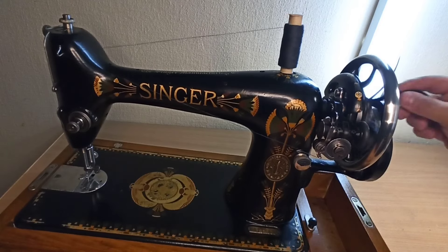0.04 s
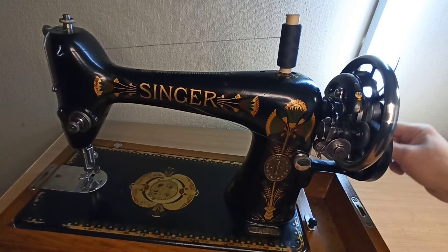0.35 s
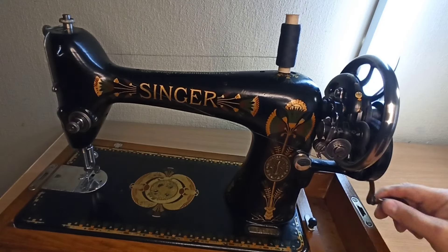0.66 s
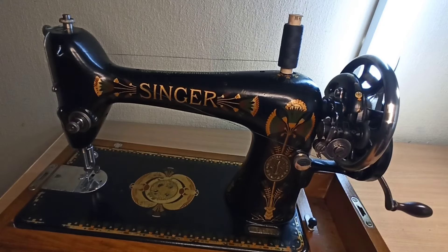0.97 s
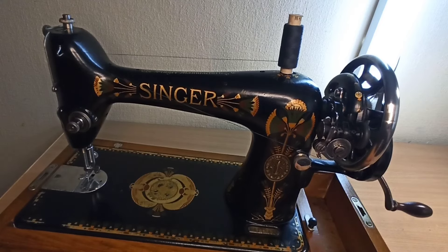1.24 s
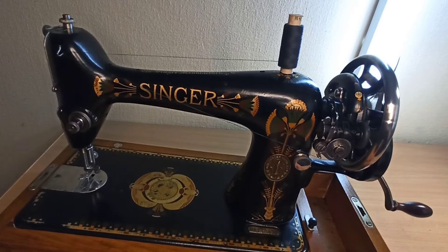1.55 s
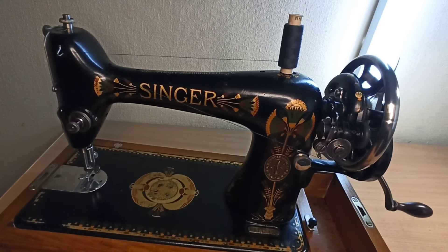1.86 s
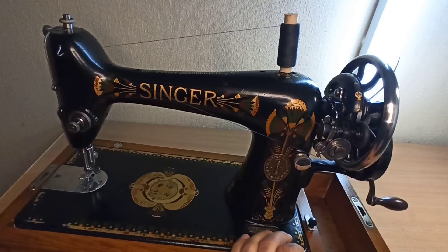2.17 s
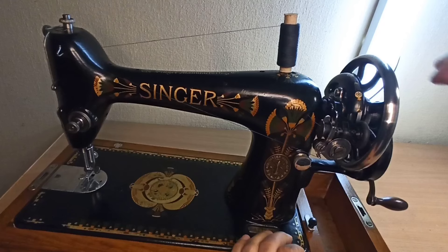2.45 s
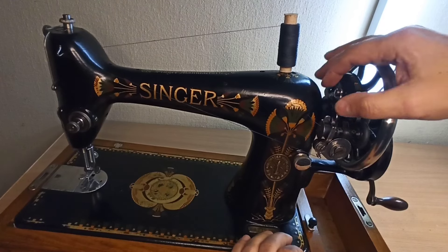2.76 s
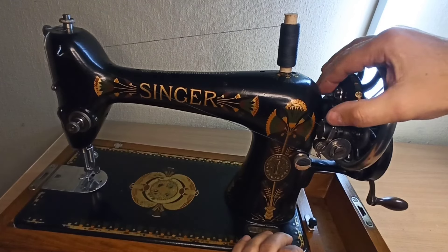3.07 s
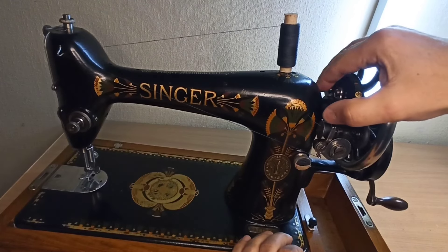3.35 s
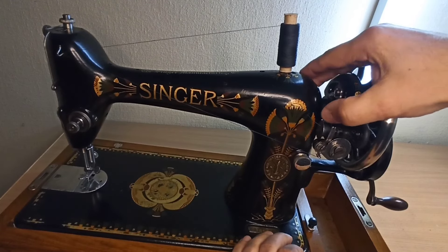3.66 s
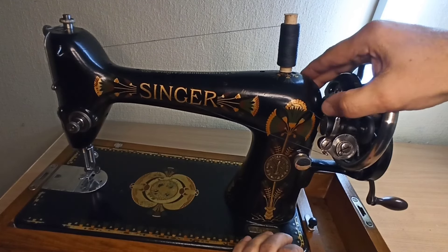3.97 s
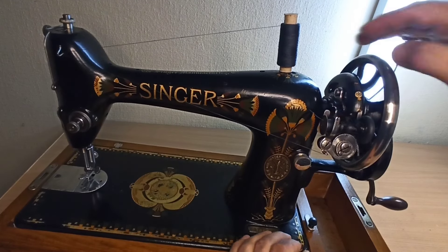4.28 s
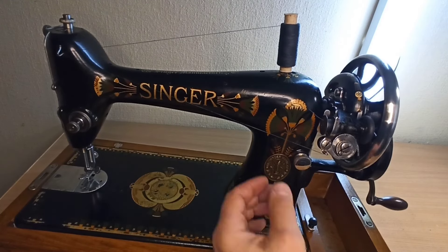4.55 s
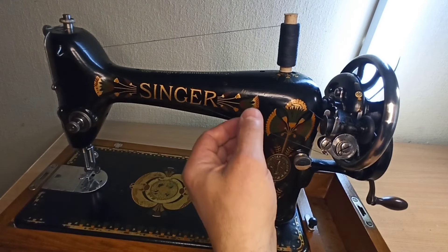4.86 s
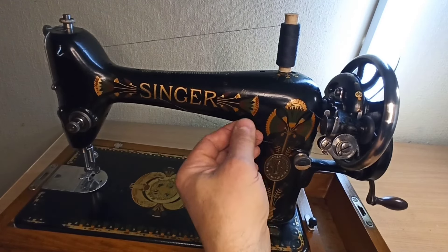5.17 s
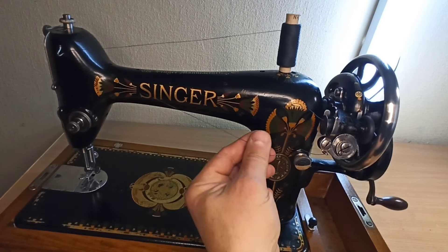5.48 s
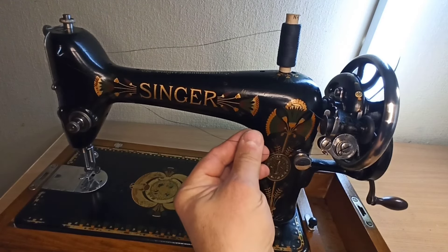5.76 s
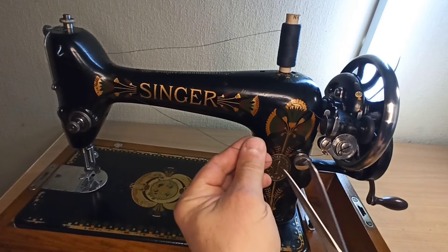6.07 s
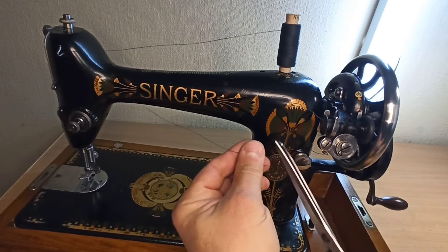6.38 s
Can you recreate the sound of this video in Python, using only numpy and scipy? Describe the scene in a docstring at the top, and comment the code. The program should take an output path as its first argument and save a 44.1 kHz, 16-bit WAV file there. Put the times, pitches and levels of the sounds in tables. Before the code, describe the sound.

In a small, quiet room, a hand-crank sewing machine turns slowly with a soft whir and clunking gears, coasting to rest after about a second. Fingers faintly brush and bump it. A sharp steel snap shakes the iron frame, then scissors knock and clink in a wooden box as they are fished out. Finally, thread is drawn tight with a tiny zip and snipped. Everything is heard close up, with little echo.

```python
"""In a small, quiet room, a hand-crank sewing machine on a wooden base is turned slowly: its gears
clunk and drone, steel slides on steel, and after about a second it coasts to rest. Fingers brush and
bump it. Near 3.9 s a hand snaps the bobbin winder back, which shakes the iron frame and its base.
Around 5 s scissors knock about in the wooden side box as they are fished out. Last, the thread is
drawn tight with a zip (5.9 s) and snipped (6.4 s)."""
import sys
import numpy as np
from scipy import signal
from scipy.io import wavfile
from scipy.ndimage import uniform_filter1d

SR = 44100
rng = np.random.default_rng(int(sys.argv[2]) if len(sys.argv) > 2 else 0)


def dump(signal):
    """Clip the signal to [-1, 1] and save it as 16-bit WAV at the path in sys.argv[1]."""
    limited = np.clip(np.atleast_2d(signal).T, -1, 1)
    pcm = np.round(limited * 32767).astype(np.int16)
    wavfile.write(sys.argv[1], SR, pcm)


N = 287532

# Levels in the tables are relative: the functions may turn a whole layer up or down.
# Tone colours: how strong a sound is from low to high. Each row: frequency in Hz, level in dB.
AIR_COLOUR = [(25, -19), (48, -13), (70, -1.5), (105, 3.5), (300, -2), (500, -7), (900, -12), (1500, -15.5),
              (2500, -20), (7000, -21), (15500, -24)]  # the still room
BRUSH_COLOUR = [(300, -17.5), (1200, -8), (2500, -5.5), (4500, -5.5), (6200, -0.5), (7300, 5), (8500, 1),
                (12000, -3.5), (15500, -7)]  # light brushing
BUMP_COLOUR = [(60, -21.5), (120, 1), (250, -2.5), (350, 1.5), (430, 7.5), (520, -10.5), (850, -6),
               (1400, -26), (4000, -31), (9000, -43)]  # a soft touch on the base
WOOD_COLOUR = [(50, -30), (90, -1.5), (180, 2), (320, -0.5), (430, 5), (800, -1.5), (1200, -6.5),
               (1900, -15.5), (2500, -21.5), (3800, -41), (5500, -32), (15000, -52)]  # the boards of the side box
HANDLE_COLOUR = [(300, -10), (900, 1), (1400, -9), (1980, 12), (2350, -12.5), (2850, 5), (3200, -5),
                 (3800, 0.5), (4500, -18), (8000, -25), (15000, -47.5)]  # scissor handles clacking
BLADE_COLOUR = [(1000, -16.5), (3000, -9), (5000, -8.5), (6500, -6.5), (7300, 0.5), (7680, 5.5),
                (8100, 1.5), (9000, -3), (12500, -18.5), (15200, -21)]  # scissor blades clinking
SNIP_COLOUR = [(150, 3), (600, -7), (1300, -1.5), (1800, -6), (2200, 0.5), (3100, -8.5), (4000, -1),
               (5500, 4), (7800, 3.5), (12000, -10), (15500, -15)]  # the blades shutting
WHIR_COLOUR = [(60, -20.5), (130, 3.5), (330, 4.5), (650, 0), (780, -8.5), (1100, -4.5), (1400, -23.5),
               (2000, -13.5), (2800, -31), (4200, -37), (6000, -43)]  # the bearings
SLIDE_COLOUR = [(500, -34), (2500, -10), (4300, -7), (5600, -5.5), (6700, 5), (7200, -4), (8200, -1.5),
                (12000, -15), (13800, -8.5), (15500, -13)]  # steel sliding on steel
CLUNK_COLOUR = [(80, -12), (250, -6), (520, 6), (680, 5.5), (800, -4), (1150, -3), (1400, -9), (1750, -6),
                (2100, -10), (2600, -23), (4100, -21), (6000, -30), (12000, -38)]  # gear teeth knocking
SNAP_COLOUR = [(500, -24), (1500, -29), (3400, -11), (4500, -12), (6000, 6), (7600, 2.5), (8600, -2),
               (12000, -2.5), (13300, 0), (15500, -11)]  # steel hitting steel
RATTLE_COLOUR = [(150, -1.5), (450, 0), (1000, 9), (1400, 0), (2200, 1.5), (4000, 1), (7000, -1.5),
                 (9000, -1.5), (15000, -24)]  # the shaken works
THUD_COLOUR = [(30, -45), (60, -20), (110, 3), (250, -4), (450, -12.5), (900, -17.5), (1500, -30),
               (6000, -60.5)]  # the machine pushing into the table
MIC_COLOUR = [(4650, -1), (4950, -11), (6000, -7.5), (6400, 0), (7700, -2), (8400, -9), (8900, -22.5),
              (10000, -27.5), (11450, -22.5), (11800, -4), (13200, -1)]  # the microphone

# Notes a struck part rings with. A ring time (t60) is how long a sound takes to fade by 60 dB.
# Each row: pitch in Hz, level in dB, ring time in seconds.
PANEL_NOTES = [(396, -7, 0.15), (435, 1, 0.198), (669, -13, 0.152)]  # a panel of the base
BOX_NOTES = [(120, -4, 0.4), (182, -4.5, 0.3), (241, -1.5, 0.32), (404.4, 1.5, 0.13), (445, 3, 0.089),
             (531, -5, 0.2), (686, -1, 0.29), (801, -1, 0.27)]  # the wooden side box
CATCH_NOTES = [(4750, -13.5, .03), (6240, -7.5, 0.028), (7400, -2.5, 0.0406), (7700, -1, .04)]  # the small steel catch of the bobbin winder
FRAME_NOTES = [(91.2, -4.5, 0.175), (105.7, 0, 0.2), (119, 1.5, .33), (140, -15.5, 0.21), (182.7, -3, .36),
               (239, -9.5, 0.23), (307, -6.5, .2), (321.6, -4.5, 0.202), (361, -7.5, .14), (438, -5, 0.13),
               (675, -8.5, 0.11), (788, -14.5, 0.21), (876, -6.5, 0.16), (1065, -23, .26), (1124, -33, .2)]  # the iron frame on its hollow base

# How long the room and the box ring on. Each row: frequency in Hz, ring time in seconds.
ROOM_RING_TIMES = [(100, 0.65), (1000, .35), (4000, 0.33), (8000, 0.23), (15000, .17)]
WOOD_RING_TIMES = [(100, 0.67), (500, 0.22), (2000, 0.42), (8000, 1)]

# Sounds that swell and fade. Each row: middle in seconds, length in seconds, peak level in dB.
BRUSHES = [(2.63, 0.11, -74.5), (2.848, 0.048, -67.5), (3.116, 0.055, -76), (3.45, 0.094, -63.5),
           (3.649, 0.2, -71), (4.195, .05, -72.5), (4.52, 0.27, -70.5), (4.971, 0.11, -68),
           (5.658, 0.069, -67.5), (5.854, 0.012, -57), (5.876, 0.092, -56), (6.404, 0.097, -54.5)]  # fingers, thread and closing blades brushing along
DRAGS = [(5.025, 0.26, -54)]  # scissors dragging along the boards
GEAR_DRONE = [(.38, 1.15, -56.5)]  # the gears, loudest in the middle of the turn
HEAVES = [(.08, .26, -48.5), (.575, 0.11, -58), (.785, .14, -51.5)]  # heavy spots where the machine bears down on its base
SCRAPES = [(.07, 0.19, -72), (.462, 0.11, -62.5), (.618, 0.083, -59.5), (.74, 0.14, -60)]  # strokes of steel over steel

# The hum of mains electricity. Each row: pitch in Hz, level in dB.
HUM_TONES = [(200, -84.5), (300, -76), (400, -86), (500, -75), (700, -89.5), (800, -85.5), (900, -86),
             (1000, -89.5)]
# Hand and crank handle touching the base. Each row: start in seconds, level in dB.
BUMPS = [(1.081, -69), (1.261, -64.5), (2.478, -62), (2.512, -56), (2.845, -62), (3.775, -67.5),
         (4.5, -64.5), (6.16, -71), (6.285, -65), (6.45, -69.5)]
# Scissors hitting the box. Each row: start in seconds, then wood, handle and blade levels in dB.
SCISSOR_KNOCKS = [(4.868, -58, -83, -92), (4.9896, -44, -52, -67), (5.035, -47, -76, -91),
                  (5.0994, -39.5, -42, -65), (5.171, -35.5, -39, -35), (5.2533, -34, -36, -33),
                  (5.3043, -42, -36, -47), (5.318, -37, -65, -65), (5.325, -36.5, -65, -58),
                  (5.3424, -39, -39, -64), (5.371, -41, -55, -67), (5.392, -46.5, -68, -78),
                  (5.5065, -42.5, -40.5, -37.5)]
# The notes the turning gears whine at. Each row: pitch in Hz, width in Hz, level in dB.
GEAR_WHINE = [(320.4, 19, -2.5), (562, 7.7, -5.5), (668, 14, -1), (1078, 16, -6), (1974, 120, -12.5),
              (3990, 190, -10.5)]
# Gear teeth taking up their slack. Each row: start in seconds, knock in dB, big gear's boom in dB.
GEAR_CLUNKS = [(.047, -58, -60), (0.094, -70, -68), (.222, -64, -52), (.285, -69, -62), (0.3593, -61, -53),
               (0.477, -58, -49), (.558, -61, -53.5), (0.6681, -61, -62), (0.7707, -47.5, -62)]
# Blows inside the machine, loudest when the winder snaps back.
# Each row: start in seconds, steel click in dB, rattle in dB, thump of the frame in dB.
BLOWS = [(.039, -80, -64, -72), (0.3588, -80, -58.5, -61), (.877, -71, -65, -65), (3.8495, -30, -38.5, -41),
         (3.874, -36.5, -38, -31), (3.902, -59.5, -45, -57), (3.997, -77, -60, -62)]


def amp(db):
    """Turns decibels into a number to multiply a sound by."""
    return 10 ** (np.asarray(db) / 20)


def unit(x):
    """Scales a sound to an average strength (rms) of 1."""
    return x / np.sqrt(np.mean(x ** 2) + 1e-20)


def unit_attack(x):
    """Scales a hit so that its first 10 ms have an average strength of 1."""
    return x / np.sqrt(np.mean(x[:SR // 100] ** 2) + 1e-20)


def look_up(table, hz):
    """Reads between the rows of a table, with all octaves equally wide."""
    row_hz, value = np.transpose(table)
    return np.interp(np.log(hz + 1), np.log(row_hz + 1), value)


def add(mix, start_s, sound):
    """Mixes a sound in at its start time."""
    part = mix[max(round(start_s * SR), 0):][:len(sound)]
    part += sound[:len(part)]


def colour(x, tone, size=4096):
    """Gives a sound a tone colour, with a filter that never rings ahead of a hit."""
    hz = abs(np.fft.fftfreq(size, 1 / SR))
    log_gain = np.log(amp(look_up(tone, hz)))
    taps = np.fft.ifft(np.exp(np.conj(signal.hilbert(log_gain)))).real
    return signal.fftconvolve(x, taps[:size // 2])[:len(x)]


def resonate(x, hz, width_hz):
    """Brings out one pitch; the smaller the width, the purer the note."""
    pole = np.exp(-np.pi * width_hz / SR) * np.exp(2j * np.pi * hz / SR)
    return unit(signal.lfilter([1], [1, -pole], x).real)


def steady(x, span_s=0.04):
    """Evens out a wavering note, as if it were pushed with constant force."""
    power = abs(uniform_filter1d(x ** 2, int(span_s * SR)))
    return x / np.sqrt(power + .02)


def friction(grain_db):
    """Rubbing: countless tiny slips, more uneven the further grain_db is from zero."""
    slips = rng.standard_normal(N)
    sizes = amp(grain_db * np.minimum(rng.exponential(1, N), 5))
    return unit(slips * sizes)


def swells(rows):
    """Loudness over time of strokes that each rise and fall in one smooth arch."""
    t = np.arange(N) / SR
    return sum(amp(db) * np.cos(np.pi * np.clip((t - middle) / length, -.5, .5)) ** 2
               for middle, length, db in rows)


def ring(notes):
    """A struck part rings with a few pure notes, each dying away."""
    t = np.arange(SR * 3 // 4) / SR
    return unit_attack(sum(amp(db - 60 * t / t60) * np.sin(2 * np.pi * hz * t) * (-1) ** k
                           for k, (hz, db, t60) in enumerate(notes)))


def dense_ring(ring_times, size=256):
    """Too many notes to count: noise in which each band fades at its own speed."""
    hz, t, bands = signal.stft(rng.choice([-1., 1.], SR // 2), SR, nperseg=size)
    fade = amp(-60 * t / look_up(ring_times, hz)[:, None])
    return signal.istft(bands * fade, SR, nperseg=size)[1]


def chatter(samples, t60):
    """A fading burst of tiny random pushes."""
    t = np.arange(samples) / SR
    return rng.choice([-1., 1.], samples) * amp(-60 * t / t60)


def click(tone, t60):
    """A hard contact: chatter in the colour of the struck part."""
    return unit_attack(colour(chatter(SR // 2, t60), tone))


def tick(tone, chatter_db, t60):
    """One clean hit followed by chatter."""
    tail = chatter(SR // 4, t60)
    force = signal.unit_impulse(len(tail)) + amp(chatter_db) * tail / np.linalg.norm(tail)
    return unit_attack(colour(force, tone))


def vary(tone, spread_db):
    """A part sounds a little different at each spot where it is struck."""
    hz, db = np.transpose(tone)
    return np.column_stack([hz, db + spread_db * rng.uniform(-0.95, 1, len(db))])


def background():
    """Still air and a faint mains hum."""
    t = np.arange(N) / SR
    hum = sum(amp(db) * np.sqrt(2) * np.sin(2 * np.pi * (hz * t + rng.random())) for hz, db in HUM_TONES)
    return amp(-67.5) * unit(colour(rng.standard_normal(N), AIR_COLOUR)) + hum


def room_echo(x, delay_s=.005):
    """The walls of a small room send the sound back as a short tail."""
    tail = np.concatenate([np.zeros(int(delay_s * SR)), dense_ring(ROOM_RING_TIMES)])
    return signal.fftconvolve(x, tail / np.linalg.norm(tail))[:N]


def thread_zip(taut_hz=9500, slack_hz=6950, sag_s=.016, jitter=0.089, rise_s=0.0053, t60=0.06):
    """Thread slips through the fingers in an uneven squeak that sinks in pitch as it slackens."""
    t = np.arange(SR // 10) / SR
    hz = slack_hz + (taut_hz - slack_hz) * np.exp(-t / sag_s)
    cycles = np.cumsum(hz * (1 + jitter * rng.standard_normal(len(t)))) / SR
    rise = np.minimum(t / rise_s, 1)
    fade = amp(-60 * np.maximum(t - rise_s, 0) / t60)
    return rise * fade * np.sin(2 * np.pi * cycles)


def hands(zip_s=5.902):
    """Light brushing, dull touches that ring a panel of the base, and the pull on the thread."""
    out = swells(BRUSHES) * unit(colour(friction(grain_db=4), BRUSH_COLOUR))
    for start, db in BUMPS:
        add(out, start, amp(db - 2.5) * tick(BUMP_COLOUR, chatter_db=6.5, t60=0.28))
        add(out, start, amp(db - 2.5) * ring(PANEL_NOTES))
    add(out, zip_s, amp(-49.5) * thread_zip())
    return out


def box_knocks():
    """Scissor handles drag over and bump the thin boards of the side box, which ring on."""
    out = swells(DRAGS) * unit(colour(friction(grain_db=4.5), WOOD_COLOUR))
    box = ring(BOX_NOTES)
    for start, wood_db, handle_db, _ in SCISSOR_KNOCKS:
        boards = unit_attack(colour(dense_ring(WOOD_RING_TIMES), WOOD_COLOUR))
        add(out, start, amp(wood_db - 3.5) * boards)
        add(out, start, amp(wood_db - 8) * tick(WOOD_COLOUR, chatter_db=7, t60=0.081))
        add(out, start, amp(wood_db - 6) * box)
        add(out, start, amp(handle_db) * click(vary(HANDLE_COLOUR, spread_db=1.5), t60=0.042))
    return out


def scissor_blades(snip_s=6.4242):
    """The steel blades clink as they are lifted out, and later snip shut."""
    out = np.zeros(N)
    for start, _, _, blade_db in SCISSOR_KNOCKS:
        add(out, start, amp(blade_db) * click(vary(BLADE_COLOUR, spread_db=3), t60=0.021))
    add(out, snip_s, amp(-42.5) * tick(SNIP_COLOUR, chatter_db=10, t60=0.013))
    return out


def motion(let_go_s=0.82, fade_db_per_s=72):
    """Loudness over time of the turning parts: full while cranked, dying away once let go."""
    coasting_s = np.maximum(np.arange(N) / SR - let_go_s, 0)
    return amp(-fade_db_per_s * coasting_s)


def handwheel(hz=1690, t60=.3):
    """Rubbing keeps one note of the iron handwheel singing, and each gear clunk rings it afresh."""
    singing = steady(resonate(friction(grain_db=-2), hz, width_hz=5.9))
    out = amp(-83) * motion() * singing
    for start, knock_db, _ in GEAR_CLUNKS:
        add(out, start, amp(knock_db - 14.5) * ring([(hz, 0, t60)]))
    return out


def crank(gear_hz=188, gear_t60=0.28, scrape_top_hz=9500, tick_s=.1175):
    """Gears, bearings and steel parts rub and knock as they turn, and the hollow base rumbles."""
    turning, heave, scrape = motion(), swells(HEAVES), swells(SCRAPES)
    base = resonate(friction(grain_db=2.5), hz=106.2, width_hz=7.9)
    base = steady(resonate(base, hz=113, width_hz=22))
    big_gear = resonate(friction(grain_db=1.6), gear_hz, width_hz=13)
    big_gear = steady(resonate(big_gear, gear_hz, width_hz=24))
    rub = friction(grain_db=2.5)
    whine = unit(sum(amp(db) * resonate(rub, hz, width) for hz, width, db in GEAR_WHINE))
    whir = unit(colour(rub, WHIR_COLOUR)) + amp(-4) * whine
    sliding = unit(colour(friction(grain_db=3.5), SLIDE_COLOUR))
    scraping = colour(friction(grain_db=4), SLIDE_COLOUR)
    scraping = unit(signal.lfilter(*signal.butter(2, scrape_top_hz, fs=SR), scraping))
    out = (amp(-62) * turning + heave) * base
    out += swells(GEAR_DRONE) * big_gear
    out += (amp(-63) * turning + amp(-12.5) * heave + amp(-5) * scrape) * whir
    out += amp(-68) * turning * sliding + amp(2.5) * scrape * scraping
    add(out, tick_s, amp(-52) * click(SLIDE_COLOUR, t60=0.022))
    for start, knock_db, boom_db in GEAR_CLUNKS:
        add(out, start, amp(knock_db) * tick(CLUNK_COLOUR, chatter_db=4, t60=0.075))
        add(out, start, amp(boom_db) * ring([(gear_hz, 0, gear_t60)]))
    return out


def machine_blows(rebound_s=.0019, frame_lag_s=.0028):
    """Steel strikes twice, the catch pings, the works rattle; then the heavy frame rings and thuds."""
    out, frame = np.zeros(N), ring(FRAME_NOTES)
    for start, click_db, rattle_db, thump_db in BLOWS:
        add(out, start, amp(click_db) * click(SNAP_COLOUR, t60=.016))
        add(out, start, amp(click_db - 1) * ring(CATCH_NOTES))
        add(out, start + rebound_s, amp(click_db + 0.5) * click(SNAP_COLOUR, t60=.019))
        rattle = click(RATTLE_COLOUR, t60=0.036) + amp(-6.5) * click(RATTLE_COLOUR, t60=0.2)
        add(out, start, amp(rattle_db) * unit_attack(rattle))
        add(out, start + frame_lag_s, amp(thump_db) * frame)
        add(out, start + frame_lag_s, amp(thump_db - 3.5) * tick(THUD_COLOUR, chatter_db=6, t60=0.12))
    return out


def scene():
    """Everything is heard close by, with a little echo from the room."""
    blows, box, blades = machine_blows(), box_knocks(), scissor_blades()
    turning = crank() + handwheel()
    touches = hands()
    echo = room_echo(amp(-12) * (blows + blades + touches) + amp(-10) * box + amp(-14.5) * turning)
    return (blows + box + blades + turning + touches + echo + background())[None]


def record(dry, low_cut_hz=62, high_cut_hz=15750):
    """The microphone colours the sound, adds faint hiss and loses the deepest and highest tones."""
    low_cut = signal.butter(3, low_cut_hz, "high", fs=SR, output="sos")
    heard = signal.sosfilt(low_cut, colour(dry[0], MIC_COLOUR))
    hiss = amp(-88.5) * rng.standard_normal(N)
    high_cut = signal.firwin(511, high_cut_hz, window=("kaiser", 9), fs=SR)
    return signal.fftconvolve(heard + hiss, high_cut, "same")[None]


dry = scene()
out = record(dry)
dump(out)
```